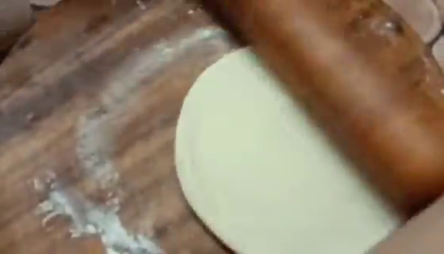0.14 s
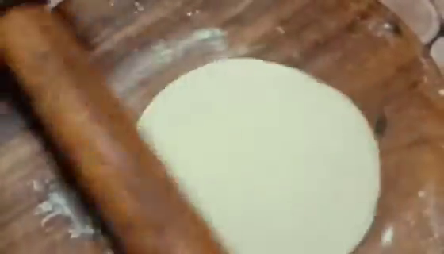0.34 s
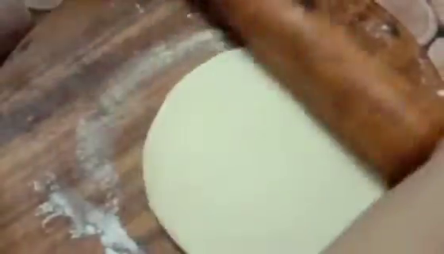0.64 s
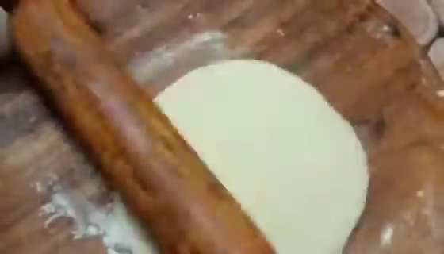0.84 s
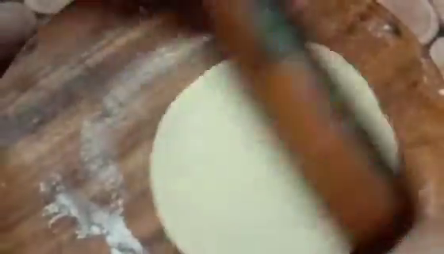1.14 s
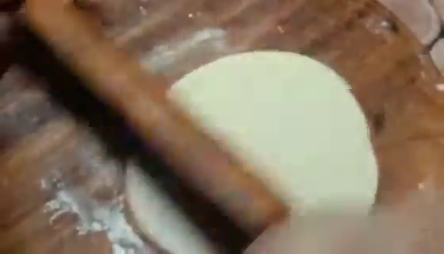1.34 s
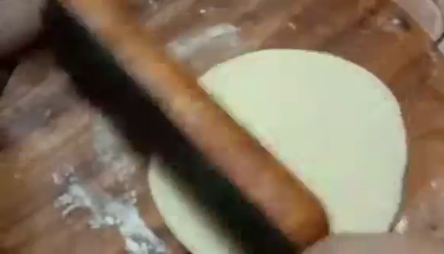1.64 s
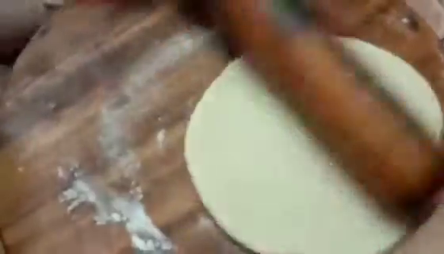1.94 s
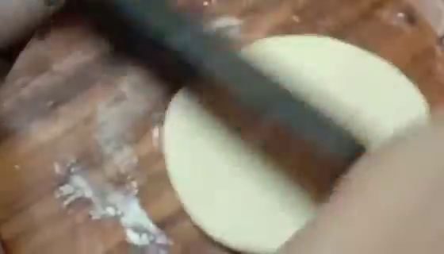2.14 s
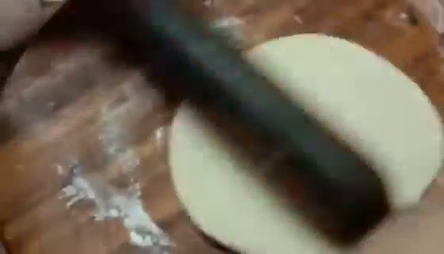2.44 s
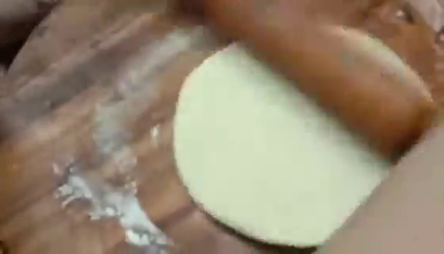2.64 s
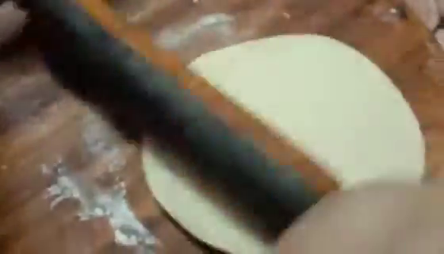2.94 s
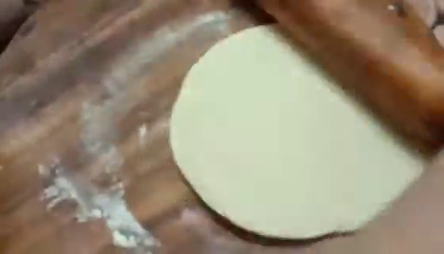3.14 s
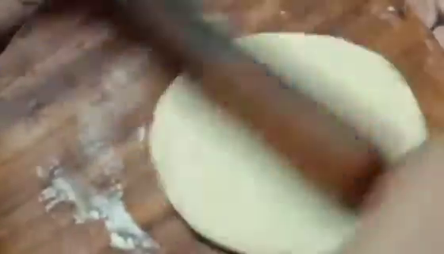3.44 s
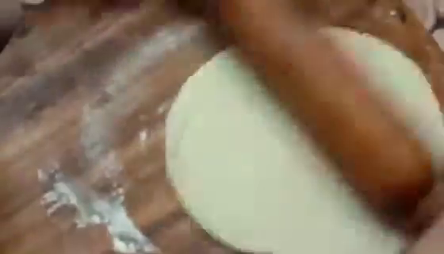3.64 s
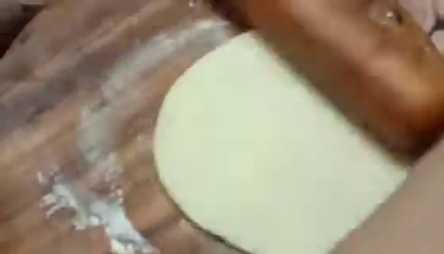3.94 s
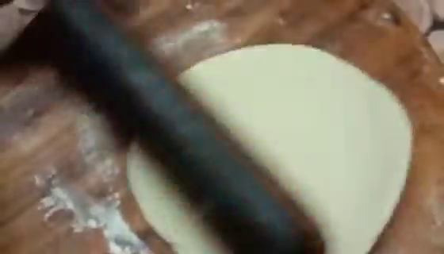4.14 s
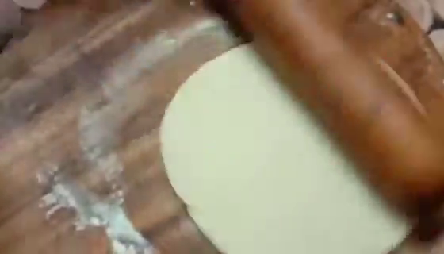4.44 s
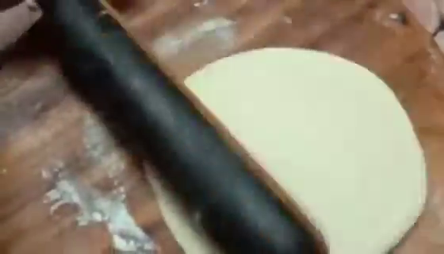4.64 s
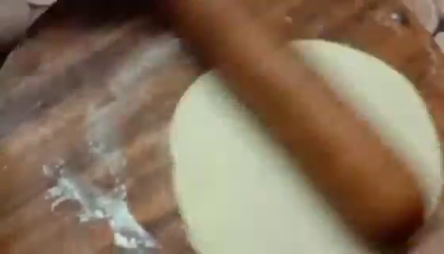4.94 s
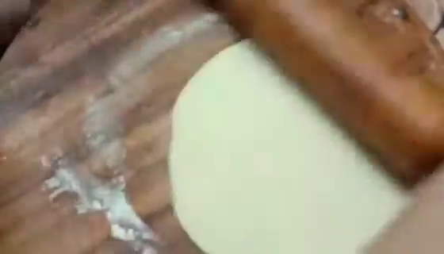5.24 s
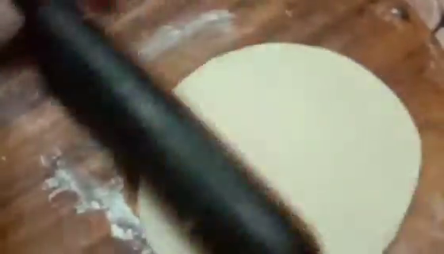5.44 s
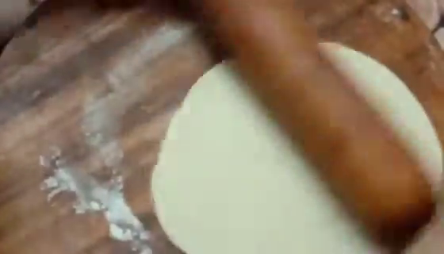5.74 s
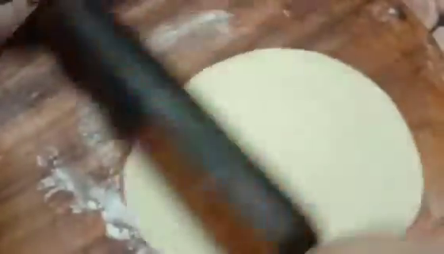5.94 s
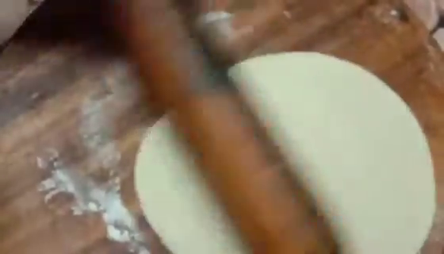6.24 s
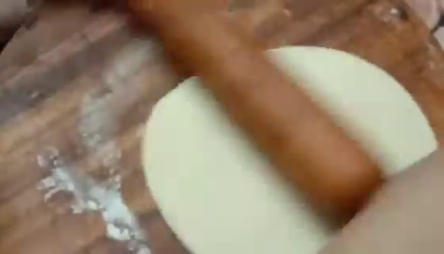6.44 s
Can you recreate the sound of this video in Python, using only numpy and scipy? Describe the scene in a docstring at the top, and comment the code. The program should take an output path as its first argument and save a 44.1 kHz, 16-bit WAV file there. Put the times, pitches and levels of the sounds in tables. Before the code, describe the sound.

Fast, breathy rubbing strokes of a floury wooden pin, broken by hollow board knocks, sharp taps and short scuffs, heard close indoors.

```python
"""Rolling out dough in a small kitchen

A wooden pin rolls out a round of dough on a wooden board, close to the microphone in a small kitchen.
Under floury palms the pin hisses and rumbles on every stroke, there and back: noise shaped by the speed.
The board tips and knocks on the counter and the pin taps and scuffs the bare wood: short pushes heard
through the modes of the board, the rings and low boom of the counter, and the room. Faint air lies behind."""
import sys
import numpy as np
from scipy import signal
from scipy.fft import rfft, irfft, next_fast_len
from scipy.io import wavfile
from scipy.ndimage import uniform_filter1d

SR = 44100
rng = np.random.default_rng(int(sys.argv[2]) if len(sys.argv) > 2 else 0)


def unload_audio(sound):
    """Save the sound as a 16-bit wav file, at the path given as the first command line argument."""
    columns = np.transpose(np.atleast_2d(sound))
    # keep every value between -1 and 1, then stretch to whole-number steps
    steps = np.round(np.clip(columns, -1, 1) * 32767)
    wavfile.write(sys.argv[1], SR, steps.astype(np.int16))


N = 290619
TIME = np.arange(N) / SR  # s
SIZE = next_fast_len(N + 2 * SR)  # transform length, with space for the tails
HZ = np.maximum(np.arange(SIZE // 2 + 1) * SR / SIZE, 1)


def undb(db):
    """Decibels to gain."""
    return 10 ** (np.asarray(db) / 20)


def level(x, db):
    """Set the rms level."""
    return x * undb(db) / np.sqrt(np.mean(x ** 2))


def read(table, hz):
    """Read (Hz, value) points on a log-frequency axis."""
    points_hz, value = np.transpose(table)
    return np.interp(np.log(hz), np.log(points_hz), value)


def through(x, response):
    """Pass a sound through a frequency response."""
    return irfft(rfft(x, SIZE) * response, SIZE)[:N]


def resonance(hz, width):
    """Response of one mode, gain 1 at its centre; width in Hz."""
    return 1 / (1 + 1j * (HZ ** 2 - hz ** 2) / (HZ * width))


def walk(rate):
    """Slow chance with a spread near 1, taking about `rate` new values a second."""
    hold = int(SR / rate)
    steps = np.repeat(rng.standard_normal(N // hold + 1), hold)
    return uniform_filter1d(steps, hold)[:N]


def add(track, s, x):
    """Mix a short sound in at time s; what falls outside the track is left out."""
    i = int(s * SR)
    x, i = x[max(-i, 0):], max(i, 0)
    track[i:i + len(x)] += x[:max(N - i, 0)]


# Still air of the kitchen. Each row: frequency in Hz, relative level in dB per Hz.
AIR_SPECTRUM = [(25, -6), (80, 1.5), (300, -2), (1500, -5), (7000, -64), (15000, -71.5)]


def still_air(db):
    """Steady noise, mostly low, shaped like the quiet air of the kitchen."""
    return level(through(rng.standard_normal(N), undb(read(AIR_SPECTRUM, HZ))), db)


# The kitchen's answer to a blow. Each row: frequency in Hz, relative level in dB.
ROOM_LEVEL = [(45, -67), (85, -21), (155, -25.5), (300, -14.5), (480, -16.5), (780, -6.5), (1010, -25),
              (1280, -7.5), (1560, -17.5), (2800, -18), (6000, -37)]
# How it dies away. Each row: frequency in Hz, time to fall by 60 dB in seconds.
ROOM_DECAY = [(100, 0.52), (400, 0.41), (1200, 0.46), (4000, 0.14)]


def room_response(db, build_s):
    """Dense reflections build up and die away, the bass last."""
    t, tail = TIME[:SR], 0
    half_band = 2 ** (1 / 6)  # bands a third of an octave wide
    for hz in 45 * 2 ** (np.arange(22) / 3):
        band = signal.butter(2, [hz / half_band, hz * half_band], "bandpass", fs=SR, output="sos")
        build_up = 1 - np.exp(-(t / build_s) ** 2)
        decay = undb(-60 * t / read(ROOM_DECAY, hz))
        echoes = signal.sosfilt(band, rng.standard_normal(SR) * build_up * decay)
        share = 2 * hz * (half_band - 1 / half_band) / SR  # part of the whole spectrum in this band
        echoes = echoes * np.sqrt(share / np.sum(echoes ** 2))
        tail = tail + echoes * undb(read(ROOM_LEVEL, hz) + db)
    return rfft(tail, SIZE)


# Longer rings of counter and board. Each row: frequency in Hz, time to fall by 60 dB in seconds,
# relative level in dB.
COUNTER_RINGS = [(129.4, 0.27, -13), (203.9, 0.35, -10), (157.8, 0.46, -24.5), (371.5, 0.38, 0),
                 (452, 0.26, -6), (503, 0.44, -9), (549, 0.29, -2), (593, 0.18, -18.5), (782, 0.28, 3.5),
                 (855, 0.13, -3.5), (958, 0.055, -4.5), (1245, 0.35, 5), (1278, 0.23, 0.5), (1553, 0.1, -4),
                 (2330, 0.13, 1)]


def ring_response(db, lag_s):
    """The counter takes up the blow a moment later and rings on."""
    rings = 0
    for k, (hz, t60, ring_db) in enumerate(COUNTER_RINGS):
        width = np.log(1000) / (np.pi * t60)
        rings = rings + (-1) ** k * undb(ring_db) * resonance(hz, width)  # neighbours in opposite sign
    return undb(db) * rings * np.exp(-2j * np.pi * HZ * lag_s)


# Damped modes of the board. Each row: frequency in Hz, width in Hz, relative level in dB.
BOARD_MODES = [(410, 78, -2), (644, 47, -2.5), (735, 98.4, 3.5), (1185, 167, 0), (1730, 78, -9),
               (2735, 150, -6)]


def board_response(low_hz):
    """A few quickly damped modes; so small a plate radiates little bass, and bending waves spread the attack."""
    modes = sum(undb(db) * resonance(hz, width) for hz, width, db in BOARD_MODES)
    spread = 1 - 2 * resonance(hz=992, width=640)  # delays without changing the level
    s = 1j * HZ / low_hz
    bass_loss = s ** 3 / ((s + 1) * (s * s + s + 1))
    return modes * spread * bass_loss


def contact(soft_ms):
    """Force of one blow: the softer the contact, the longer and duller the push."""
    u = TIME[:SR // 50] * 1000 / soft_ms
    return u ** 3 * np.exp(-u)


# The board tips and drops back on the counter. Each row: start in seconds, peak of the first knock through
# the board alone in dB, softness of the contact in ms, boom from the weight of the arms in dB.
BOARD_DROPS = [(-.073, -30, .9, -36), (.509, -29, 1.05, -33.5), (.619, -40.5, 0.36, -59),
               (1.0603, -43.5, 0.67, -67), (1.446, -25, 0.51, -61), (1.5228, -19, .4, -41.5),
               (2.0442, -4.5, .24, -34.5), (2.3123, -39, 0.57, -48.5), (2.859, -8.5, .25, -32.5),
               (3.413, -18.5, 0.4, -51), (3.7029, -4.5, 0.23, -33), (3.9304, -21.5, 0.27, -58),
               (3.9896, -26.5, 0.49, -43), (4.114, -18.5, .3, -35), (4.422, -34, 0.66, -53),
               (4.5846, -4, 0.22, -37.5), (4.8461, -33.5, 0.62, -51), (4.9645, -8.5, 0.27, -37),
               (5.183, -23.5, 0.44, -69), (5.27, -35, 0.73, -48), (5.591, -26, 0.44, -64),
               (5.8139, -27, 0.47, -39), (5.947, -34.5, 0.98, -58), (6.2404, -29, 0.49, -47.5),
               (6.402, -19, 0.36, -58)]
# The pin taps the board. Each row: start in seconds, peak of the first knock through the board alone in dB,
# softness of the contact in ms.
PIN_TAPS = [(0.0366, -40, 0.23), (0.4959, -33, 0.12), (1.0, -39.5, 0.029), (1.3283, -0.5, 0.091),
            (2.4599, -30, 0.027), (3.1237, -31, 0.28), (3.4111, -12, .13), (3.9165, -22.5, 0.32),
            (4.3546, -21, 0.33), (4.806, -34, 0.3), (5.1714, -27.5, 0.33), (5.6214, -21.5, 0.32),
            (5.9258, -37, 0.21), (6.0383, -27, 0.37), (6.3995, -11.5, .11), (6.485, -27, 0.34)]


def knocks(table, board, bounce_db, bounce_s, edge_db, edge_s):
    """Wood lands on one edge and then the other; two faint uneven bounces follow as it settles."""
    force, clack = np.zeros(N), irfft(board, SIZE)[:SR // 30]
    for s, db, soft_ms, *_ in table:
        push = contact(soft_ms)
        push = push * undb(db) / np.abs(signal.fftconvolve(push, clack)).max()
        add(force, s, push)
        edge_delay = edge_s * rng.uniform(.92, 1.08)
        add(force, s + edge_delay, push * undb(edge_db + 2 * rng.standard_normal()))
        gaps = bounce_s * np.array([1, .5]) * rng.uniform(.8, 1.2, 2)
        for delay in np.cumsum(gaps):
            add(force, s + delay, push * undb(bounce_db + 2 * rng.standard_normal()))
    return force


BOOM_LAG_S = .013  # the counter gives way just after the knock
TAP_BOOM_DB = -36  # boom of the counter relative to the peak of a tap


def thuds(hz, swell_s):
    """The lowest mode of the counter swells and dies slowly after each drop and tap."""
    out = np.zeros(N)
    pushes = [(s, boom_db) for s, _, _, boom_db in BOARD_DROPS]
    pushes += [(s, db + TAP_BOOM_DB) for s, db, _ in PIN_TAPS]
    age = TIME[:SR]
    swell = age / swell_s * np.exp(1 - age / swell_s)
    boom = swell * np.sin(2 * np.pi * hz * age)
    for s, db in pushes:
        add(out, s + BOOM_LAG_S, undb(db) * boom)
    return out


# The pin's end scuffs the board. Each row: start in seconds, length in seconds,
# rms level through the board alone in dB.
PIN_SCUFFS = [(1.354, 0.026, -33), (1.446, 0.025, -41.5), (3.117, 0.033, -47), (3.428, 0.023, -38),
              (3.915, .03, -44), (4.225, 0.017, -45.5), (4.355, 0.034, -40), (5.171, .05, -41),
              (5.578, .062, -40.5), (6.029, 0.034, -43), (6.436, 0.059, -44.5)]


def scuffs(board, soft_ms, slips_per_s):
    """Wood sticks and slips on wood: a short run of uneven little pushes."""
    force, clack = np.zeros(N), irfft(board, SIZE)[:SR // 30]
    for s, length, db in PIN_SCUFFS:
        n = int(length * SR)
        slips = np.zeros(n)
        draws = rng.random((64, 2))[:max(int(length * slips_per_s), 2)]
        places = (np.arange(len(draws)) + draws[:, 0]) / len(draws)
        strength = undb(14.0 * draws[:, 1]) * np.sqrt(np.sin(np.pi * places))  # tends to peak midway
        slips[(places * (n - 1)).astype(int)] = strength
        push = signal.fftconvolve(slips, contact(soft_ms))
        rms = np.sqrt(np.sum(signal.fftconvolve(push, clack) ** 2) / n)
        add(force, s, push * undb(db) / rms)
    return force


# The pin is pushed away and pulled back in turn; one stroke may run into the next. Each row:
# start in seconds, length in seconds, relative rubbing level at full speed in dB.
PIN_STROKES = [(-0.142, 0.28, -55), (0.168, 0.27, -50), (0.446, 0.25, -54), (0.685, 0.24, -50),
               (0.903, 0.23, -48.5), (1.119, 0.24, -48), (1.352, 0.23, -50), (1.554, 0.18, -50),
               (1.729, 0.23, -50.5), (1.927, 0.24, -49.5), (2.121, 0.254, -51.5), (2.335, 0.25, -49.5),
               (2.55, 0.24, -50), (2.755, 0.25, -47), (2.957, 0.24, -49.5), (3.166, 0.26, -50.5),
               (3.376, 0.25, -52), (3.608, 0.25, -48.5), (3.816, 0.23, -49), (4.034, 0.26, -48.5),
               (4.248, 0.242, -51), (4.451, 0.26, -49.0), (4.674, 0.23, -51.5), (4.879, 0.25, -47.5),
               (5.096, 0.23, -50), (5.284, 0.28, -50.5), (5.515, 0.24, -51.0), (5.732, 0.22, -49.5),
               (5.916, 0.29, -52), (6.163, 0.24, -50.5), (6.374, 0.27, -53.5)]
SPEED_POWER, REST_DB = 1.22, -70.5  # rubbing grows with speed and all but stops at rest


def strokes():
    """Rubbing level in dB: on each stroke the pin gathers speed and slows to the next turn, like a pendulum."""
    power = undb(REST_DB) ** 2
    for start, length, db in PIN_STROKES:
        speed = np.sin(np.pi * np.clip((TIME - start) / length, 0, 1))
        power = power + (undb(db) * speed ** SPEED_POWER) ** 2
    return 10 * np.log10(power)


# The pin rumbles over the dough. Each row: frequency in Hz, relative level in dB per Hz.
RUMBLE_SPECTRUM = [(25, -32), (55, -12), (80, 8), (130, 7), (210, 5), (320, -9), (600, -26), (2000, -51)]


def rumble(stroke_db, db):
    """The pin runs over small lumps in the dough; db is relative to the stroke."""
    lumps = undb(4 * walk(16))
    noise = through(rng.standard_normal(N), undb(read(RUMBLE_SPECTRUM, HZ)))
    return level(noise, db) * undb(stroke_db) * lumps


def grit(stroke_db, board, db, per_s, soft_ms):
    """Loose flour is crushed between pin and board in tiny uneven ticks; db is relative to the stroke."""
    ticks = (rng.random(N) < per_s / SR) * undb(12 * rng.random(N))
    crushed = through(ticks, rfft(contact(soft_ms), SIZE) * board)
    return level(crushed, db) * undb(stroke_db)


# A grain of flour cracks under the pin. Each row: start in seconds, gain on the hiss in dB.
GRAIN_CRACKS = [(0.999, -38), (1.45, -54), (2.461, -56)]


def cracks(t60_s):
    """Each cracking grain is a tiny burst that starts at full strength and dies at once."""
    return sum(undb(db - 60 * np.abs(TIME - s) / t60_s) * (TIME >= s) for s, db in GRAIN_CRACKS)


def near_echoes(db, fade_s):
    """Board, hands and nearby walls ripple the spectrum of the hiss."""
    t = TIME[:SR // 10]
    echoes = rng.standard_normal(len(t)) * np.exp(-t / fade_s)
    return 1 + undb(db) * rfft(echoes / np.sqrt(np.sum(echoes ** 2)), SIZE)


def wander(x, depth_db, rate):
    """The hands move over the pin, so each part of the hiss swells and fades a little on its own."""
    centres = np.geomspace(500, 14000, 12)  # Hz
    out = 0
    for share in np.eye(len(centres)):
        band = through(x, np.interp(HZ, centres, share))
        out = out + band * undb(depth_db * walk(rate))
    return out


# Skin and flour rubbing on wood. Each row: frequency in Hz, relative level in dB per Hz.
RUB_SPECTRUM = [(100, -18), (300, -14.5), (1000, -11), (2600, -3.5), (4000, -3.5), (5200, -1), (6400, 4),
                (8000, -3), (9500, -10.5), (12500, -19.5), (14000, -21.5), (15200, -18)]
# Resonances of the pin, the hollow of the hands and, at the top, the microphone. Each row:
# frequency in Hz, width in Hz before widening, relative level in dB.
HISS_RESONANCES = [(660, 88, 5), (1248, 61, 5.5), (1788, 104, 4.5), (2097, 350, -3.5), (3455, 205, 3),
                   (5730, 230, 1), (6050, 380, -2), (7190, 320, 1.5), (7540, 320, 1.5), (15100, 530, -5)]


def rubbing(stroke_db, db, grain_db, flicker_db, grip_db, low_follow, high_follow):
    """Flour grains and skin slide on the turning pin; a faster stroke is louder and brighter."""
    pressure = undb(grain_db * walk(2500) + flicker_db * walk(70))
    hiss = through(rng.standard_normal(N) * pressure, undb(read(RUB_SPECTRUM, HZ)))
    for hz, width, peak_db in HISS_RESONANCES:
        # each resonance swells and fades on its own, those of pin and hands with the shifting grip
        ring = through(rng.standard_normal(N) * pressure, resonance(hz, 1.44 * width) ** 2)
        hiss = hiss + ring * undb(peak_db + grip_db * walk(14))
    hiss = through(hiss, near_echoes(db=-9, fade_s=0.0034))
    hiss = level(wander(hiss, depth_db=3.0, rate=16), db)
    # the lowest and highest parts follow the stroke more steeply than the middle
    low = through(hiss, 1 / (1 + (HZ / 2600) ** 4))
    high = through(hiss, 1 - 1 / (1 + (HZ / 9000) ** 8))
    middle = hiss - low - high
    effort_db = stroke_db - np.median(stroke_db)
    sliding = middle + low * undb(low_follow * effort_db) + high * undb(high_follow * effort_db)
    return undb(stroke_db) * sliding + hiss * cracks(t60_s=0.073)


def scene():
    """Blows and scuffs sound through board, counter and room, over the rolling strokes."""
    air = still_air(db=-65)
    room = room_response(db=0.5, build_s=0.003)
    # a drop moves the whole board and shakes the counter; a tap of the pin shakes it less
    whole, top = board_response(low_hz=334), board_response(low_hz=478)
    drops = knocks(BOARD_DROPS, whole, bounce_db=-20.0, bounce_s=.026, edge_db=-8.0, edge_s=0.004693)
    taps = knocks(PIN_TAPS, top, bounce_db=-19, bounce_s=0.02, edge_db=-15, edge_s=0.0033)
    taps += scuffs(top, soft_ms=0.058, slips_per_s=170)
    wood = through(drops, whole + ring_response(db=2.5, lag_s=0.006064) + room)
    wood += through(taps, top + ring_response(db=-4.5, lag_s=0.005076) + undb(-0.5) * room)
    stroke_db = strokes()
    rolling = rubbing(stroke_db, db=3.0, grain_db=2.0, flicker_db=1.12, grip_db=3,
                      low_follow=0.06, high_follow=0.13)
    rolling += grit(stroke_db, top + room, db=-25, per_s=68, soft_ms=0.028)
    rolling += rumble(stroke_db, db=-8.5)
    return (air + wood + thuds(hz=77.5, swell_s=0.052) + rolling)[None]


TOP_HZ = 15600  # almost nothing passes much above this


def record(dry):
    """The microphone port swallows one narrow treble band; sharp peaks are rounded and the top is cut."""
    heard = through(dry[0], 1 - undb(-2.0) * resonance(hz=6550, width=410))
    heard = np.tanh(1.083 * heard) / 1.111
    top_cut = signal.ellip(10, .2, 70, TOP_HZ, fs=SR, output="sos")
    return signal.sosfilt(top_cut, heard)[None]


dry = scene()
out = record(dry)
unload_audio(out)
```